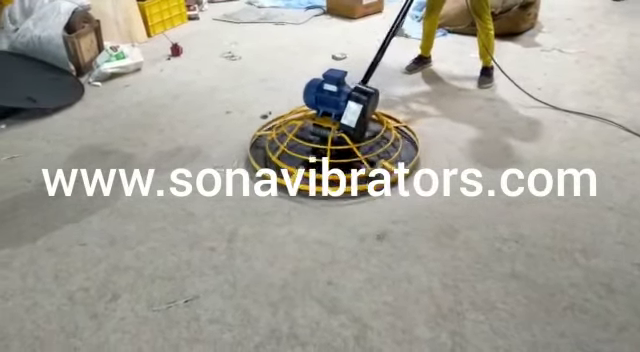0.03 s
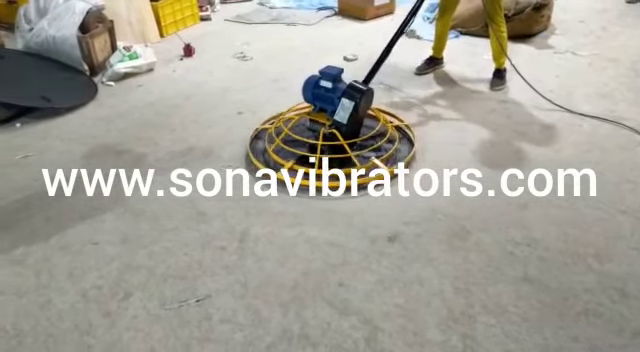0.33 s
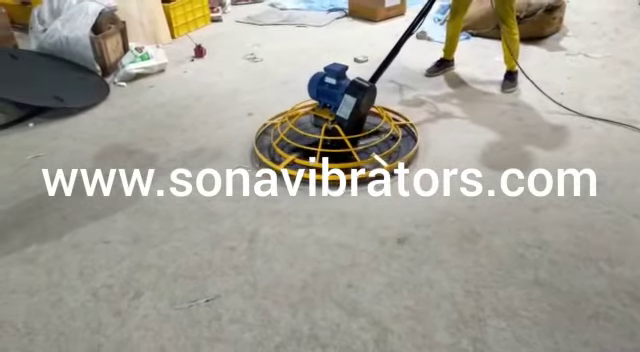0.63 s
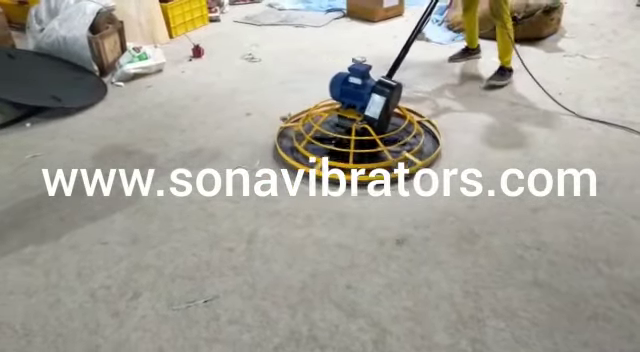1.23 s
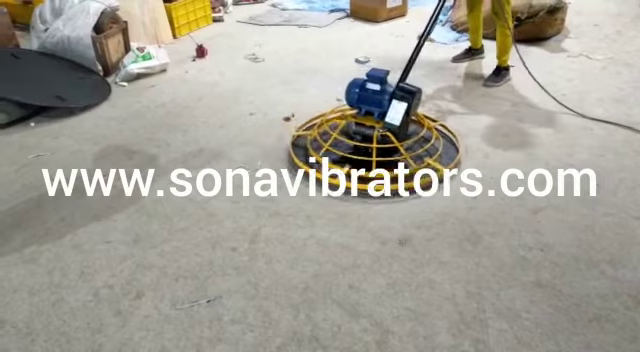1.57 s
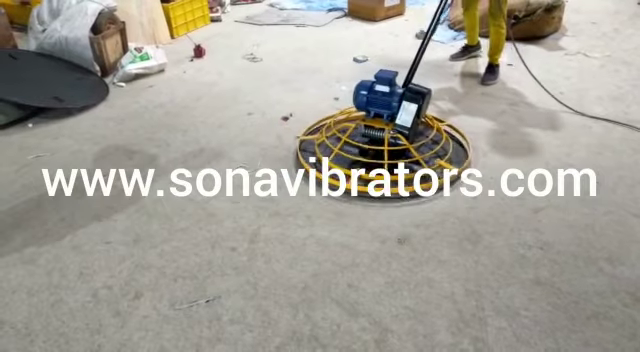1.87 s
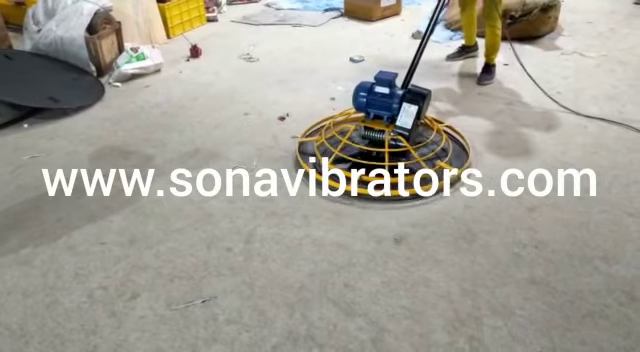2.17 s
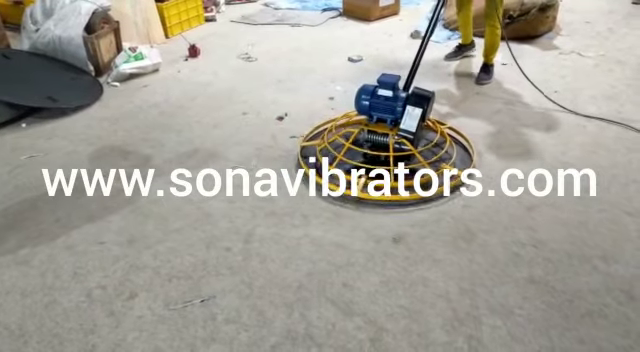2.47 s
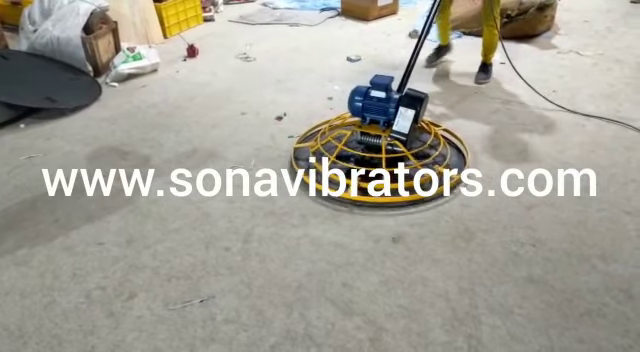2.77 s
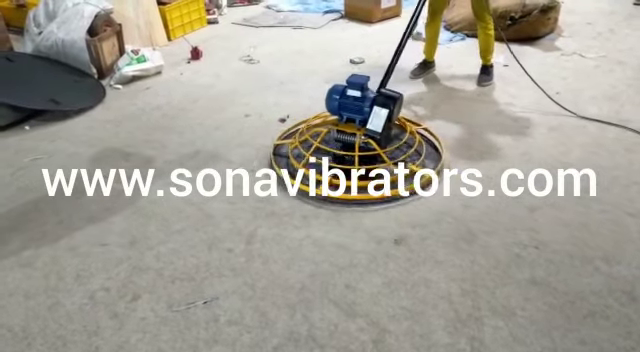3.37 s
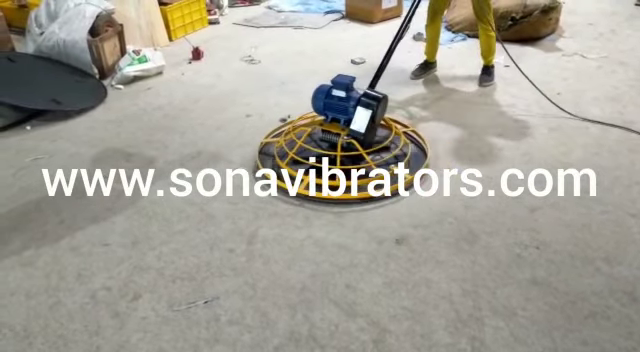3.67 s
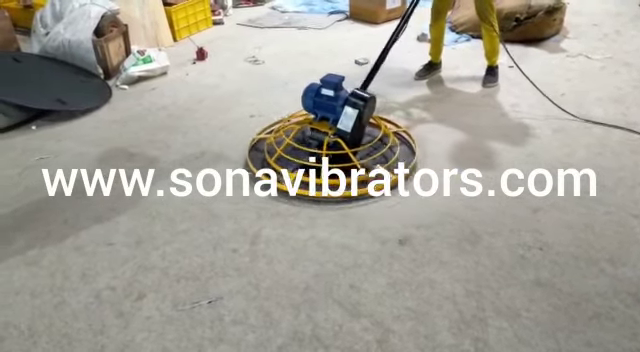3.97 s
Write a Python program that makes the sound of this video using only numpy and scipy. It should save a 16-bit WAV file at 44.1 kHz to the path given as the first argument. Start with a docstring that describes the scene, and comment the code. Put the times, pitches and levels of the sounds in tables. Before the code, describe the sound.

A power trowel scrapes a concrete floor with a continuous gritty roar over a faint low hum. Hollow metal knocks, rattles and bright rasps break through, heard from a few metres away in an echoing workshop.

```python
"""An electric power trowel polishes concrete in a hard-walled workshop, a few metres from a mono microphone.
From the start, grit crushed under the spinning steel roars over a low drive hum. At 0.3 s one stone snaps,
and high spots in the floor begin to knock and rattle the pan. The roar eases around 1.3 s, rasps on rough
patches and builds again, with more knocks and rattles, while the hum sinks slowly to the end."""
import sys
import numpy as np
from scipy import signal
from scipy.fft import rfft, irfft
from scipy.io import wavfile
from scipy.ndimage import map_coordinates

SR = 44100
rng = np.random.default_rng(int(sys.argv[2]) if len(sys.argv) > 2 else 0)


def dump(signal):
    """Clip the signal to [-1, 1] and save it as 16-bit WAV at the path in sys.argv[1]."""
    limited = np.clip(np.atleast_2d(signal).T, -1, 1)
    pcm = np.round(limited * 32767).astype(np.int16)
    wavfile.write(sys.argv[1], SR, pcm)


N = 176400
TIME = np.arange(N) / SR
GRIT_PER_S, SAND_PER_S, RATTLES_PER_S = 12000, 14000, 1200


def undb(db):
    """Decibels to gain."""
    return 10 ** (np.asarray(db) / 20)


def unit(x):
    """Scale to rms 1."""
    return x / np.sqrt(np.mean(x ** 2))


def curve(table, column):
    """One column of a table, joined by straight lines in time."""
    rows = np.array(table)
    return np.interp(TIME, rows[:, 0], rows[:, column])


def colour(x, outline):
    """Filter by a (frequency [Hz], level [dB]) outline; rms 1."""
    hz, db = np.array(outline).T
    f = np.fft.rfftfreq(N, 1 / SR) + 1
    gain = undb(np.interp(np.log(f), np.log(hz), db))
    return unit(irfft(rfft(x) * gain, N))


def wander(per_s):
    """Smooth random drift; rms 1."""
    return unit(map_coordinates(rng.standard_normal(2048), [TIME * per_s], order=3, mode="mirror"))


def grains(per_s, spread_db):
    """Random tiny impacts, mostly weak with a few strong ones."""
    hit = rng.random(N) < per_s / SR
    size = undb(spread_db * np.minimum(rng.exponential(size=N), 6))
    return unit(hit * size * np.sign(rng.standard_normal(N)))


def burst(start, length, attack_s, release_s):
    """An envelope that rises, holds and dies away."""
    age = TIME - start
    return np.clip(age / attack_s, 0, 1) * np.exp(-np.maximum(age - length, 0) / release_s)


def ring(x, modes):
    """A bank of resonances with unit power gain."""
    f = np.fft.rfftfreq(2 * N, 1 / SR) + 1
    response = sum(undb(db) / (1 + 1j * (f / hz - hz / f) * hz / width) for hz, width, db in modes)
    response /= np.sqrt(np.mean(abs(response) ** 2))
    return irfft(rfft(x, 2 * N) * response)[:N]


def workshop(x, wet_db=-5, t60_s=.85, gap_s=.006, change_hz=.2966):
    """The microphone hears direct sound and the walls' echo, whose pattern shifts as the machine moves."""
    t = TIME[:SR]
    tails = rng.standard_normal((2, SR)) * np.exp(-np.log(1000) * t / t60_s) * (t > gap_s)
    primed = np.concatenate([x[-SR:], x])  # the room is already sounding at the start
    here, there = (signal.fftconvolve(primed, tail / np.linalg.norm(tail))[SR:SR + N] for tail in tails)
    angle = 2 * np.pi * change_hz * TIME
    echo = here * np.cos(angle) + there * np.sin(angle)
    return (x + undb(wet_db) * echo) / np.hypot(1, undb(wet_db))


# Spectrum of the room tone (frequency [Hz], relative level [dB])
RUMBLE_SPECTRUM = [(10, -1.5), (25, -6.5), (60, 1), (100, -8.5), (170, 1), (280, -3), (500, -2),
                   (2000, -38)]

def room_tone():
    """The workshop's steady low rumble, all around the microphone."""
    return undb(-51) * colour(rng.standard_normal(N), RUMBLE_SPECTRUM)


# Course of the drive's hum (time [s], pitch [Hz], level [dB])
DRIVE_HUM = [(0, 40, -61), (.3, 42.1, -51), (.45, 41.4, -52.5), (.58, 44.7, -55), (.73, 42.76, -48),
             (1.02, 42.8, -58), (1.33, 41.4, -53), (1.55, 40.3, -57), (1.78, 40.8, -56.5),
             (2.1, 40.3, -53.5), (2.45, 37.4, -59), (3.0, 35.9, -56), (4, 33.1, -56)]

def drive(waver_db=2.2, octave_fade_db_per_s=4.5):
    """The electric drive hums low and wavers; its octave fades away."""
    phase = 2 * np.pi * np.cumsum(curve(DRIVE_HUM, 1)) / SR
    tone_db = curve(DRIVE_HUM, 2) + waver_db * wander(per_s=13)
    octave_db = -57.5 - octave_fade_db_per_s * TIME + waver_db * wander(per_s=6)
    return np.sqrt(2) * (np.sin(phase) * undb(tone_db) + np.sin(2 * phase) * undb(octave_db))


# Spectrum of the snapping stone (frequency [Hz], relative level [dB])
SNAP_SPECTRUM = [(1000, -25), (3000, -14), (4100, -7), (4560, 1), (5100, -6), (6200, -5), (7400, -5),
                 (8200, -14)]

def stone(start_s=.2848, decay_s=.0088):
    """A stone snaps against the steel: a bright crack of a few milliseconds."""
    envelope = np.exp(-np.maximum(TIME - start_s, 0) / decay_s) * (TIME > start_s)
    crack = undb(-13.5) * envelope * colour(rng.standard_normal(N), SNAP_SPECTRUM)
    return workshop(crack, wet_db=-6.5)


# Modes of the steel pan (frequency [Hz], width [Hz], relative level [dB])
PAN_MODES = [(335, 14, -11), (368, 22, -4), (393, 8, 7), (417, 7, 4), (468, 12, -3), (495, 22, -3),
             (582, 8, 2), (607, 11, 0), (640, 25, -4), (755, 30, -2), (924, 30, 0)]

def pan(force):
    """The steel pan rings when it is struck or rubbed."""
    return ring(force, PAN_MODES)


# Hollow knocks of the pan (time [s], peak level before the room [dB])
PAN_KNOCKS = [(.335, -19), (.505, -24), (.745, -17), (1.63, -18), (2.36, -25), (2.72, -19), (2.875, -25)]

def knocks(contact_s=.0026):
    """The pan drops back on the floor: a soft blow that rings mostly its lowest modes."""
    force = np.sin(np.pi * TIME / contact_s) ** 2 * (TIME < contact_s)
    knock = pan(force)
    knock /= np.max(abs(knock))
    return workshop(sum(undb(db) * np.interp(TIME - at, TIME, knock, left=0) for at, db in PAN_KNOCKS))


# Spectrum of the pan's boom (frequency [Hz], relative level [dB])
BOOM_SPECTRUM = [(60, -30), (180, -10), (260, -7), (305, -14), (380, 5.5), (437, -8), (490, 12),
                 (600, -9.5), (900, 2), (2000, -25.5)]
# Spectrum of its clatter (frequency [multiple of the centre], relative level [dB])
CLATTER_SPECTRUM = [(.1, -26), (.25, -28), (.5, -11), (.75, -3), (1, 0), (1.25, -3), (1.7, -11), (2.6, -19),
                    (5, -60)]
# High spots (time [s], length [s], relative boom level [dB], clatter level [dB], clatter centre [Hz])
HIGH_SPOTS = [(0.281, 0.04, -28, -22.5, 850), (0.338, 0.06, -28.5, -26.5, 1200),
              (0.475, 0.06, -36, -33.5, 1100), (0.696, 0.035, -33, -28, 1250), (0.77, 0.056, -39, -32, 950),
              (1.565, 0.094, -35, -30.5, 950), (1.714, 0.018, -34, -30, 950),
              (1.835, 0.035, -42, -23, 1350), (1.9, 0.08, -48, -27, 1600), (2.066, 0.1, -39, -37, 1100),
              (2.334, 0.11, -37, -37, 1100), (2.542, .04, -40, -26, 1000), (2.68, 0.075, -32, -28, 950),
              (2.876, .04, -42, -32, 950), (3.405, 0.025, -40, -28, 900), (3.496, 0.027, -37, -29.5, 950),
              (3.59, 0.02, -35, -28, 950), (3.702, 0.022, -35.5, -29, 1100), (3.919, .04, -39, -26, 1150)]

def bumps(spread_db=2):
    """Each high spot in the floor sets off a short burst of rattling: the pan booms and clatters."""
    boom_gain, clatter = 0, 0
    for start, length, boom_db, clatter_db, centre_hz in HIGH_SPOTS:
        push = burst(start, length, attack_s=.006, release_s=.03)
        boom_gain = np.hypot(boom_gain, push * undb(boom_db))  # overlapping booms add in power
        spectrum = [(ratio * centre_hz, db) for ratio, db in CLATTER_SPECTRUM]
        rattle = colour(grains(RATTLES_PER_S, spread_db), spectrum)
        clatter += push * undb(clatter_db) * rattle
    taps = grains(RATTLES_PER_S, spread_db)
    thuds = colour(grains(RATTLES_PER_S, spread_db), BOOM_SPECTRUM)
    boom = undb(-3) * pan(taps * boom_gain) + undb(-8.5) * boom_gain * thuds
    return workshop(boom + clatter)


# Spectrum of a rasp (frequency [Hz], relative level [dB])
RASP_SPECTRUM = [(1200, -29.5), (2400, -8), (3600, 1), (4600, -0.5), (5700, -1), (7000, -1), (8100, -22)]
# Rough patches in the concrete (time [s], length [s], level [dB])
ROUGH_PATCHES = [(.37, .03, -31), (1.285, .06, -34), (1.485, .13, -29), (1.805, .17, -29.5),
                 (2.385, .04, -33), (2.58, .05, -31.5), (2.69, .13, -32), (3.54, .03, -32),
                 (3.675, .03, -32)]

def rasps():
    """The steel bites into a rough patch: a sudden bright rasp."""
    pressure = sum(undb(db) * burst(start, length, attack_s=.015, release_s=.018)
                   for start, length, db in ROUGH_PATCHES)
    return workshop(pressure * colour(grains(SAND_PER_S, spread_db=2.4), RASP_SPECTRUM))


# Broad modes of the steel edges (frequency [Hz], width [Hz], relative level [dB])
EDGE_MODES = [(1450, 130, -9), (1985, 105, 3.5), (2230, 130, -7), (2400, 110, -8), (3634, 40, -14),
              (3980, 150, -8)]

def steel_edges(rub, wander_db=1.6):
    """The scraping edges ring, each mode drifting in level on its own."""
    return unit(sum(undb(db + wander_db * wander(per_s=12)) * ring(rub, [(hz, width, 0)])
                    for hz, width, db in EDGE_MODES))


# Spectrum of the crushed grit (frequency [Hz], relative level [dB])
ROAR_SPECTRUM = [(100, -32.5), (290, -29.5), (375, -13), (437, -16.5), (500, -11.5), (690, -10.5),
                 (900, -8), (1200, -6), (1450, -3), (1800, -2.5), (2400, -1.5), (2750, -4.5), (3250, -12),
                 (4000, -10), (4500, -10.5), (5200, -20.5), (8000, -51.5)]
# Spectrum of the fine sand (frequency [Hz], relative level [dB])
HISS_SPECTRUM = [(1500, -19.5), (2800, 5), (3500, 6.5), (3750, 3), (4000, 6.5), (4450, 3.5), (4900, 0),
                 (5500, 1), (6000, 0.5), (6370, 4.5), (6600, 0), (6900, 4), (7300, -5), (7650, -6),
                 (8100, -42)]
# The scrape from a few metres (time [s], roar level [dB], relative hiss level [dB], edge level [dB])
SCRAPE_LEVELS = [(0, -23.3, -32, -30), (.1, -23.9, -34, -30), (.2, -25, -38, -30.5), (.27, -25, -37.5, -30),
                 (.44, -23.3, -35.5, -28), (.57, -23.8, -33.7, -29.5), (.69, -24.8, -35.3, -29.5),
                 (.82, -24.5, -35.7, -29.5), (.96, -26.3, -36.5, -33), (1.08, -26.3, -36.7, -31.5),
                 (1.24, -27.8, -38.5, -35), (1.34, -28, -37, -35), (1.45, -27.2, -37, -32),
                 (1.56, -26.8, -36, -33), (1.65, -25.5, -35, -31.5), (1.78, -26.7, -36, -32),
                 (1.94, -23.7, -34.5, -28.5), (2.12, -25, -35, -31.5), (2.31, -25, -34.3, -29.5),
                 (2.4, -25.6, -35.3, -32), (2.53, -25.7, -35.3, -30.5), (2.7, -23.6, -33, -29.5),
                 (2.95, -23.6, -32.8, -28.5), (3.2, -23.8, -33.3, -27.5), (3.45, -23.3, -33.8, -26.7),
                 (3.66, -23.6, -34.8, -27.5), (3.82, -24.1, -36.3, -28), (4, -24, -37.3, -28)]

def scrape(flutter_db=.4, surge_db=.6):
    """Grit roars and rings the steel, fine sand hisses; uneven contact makes them flutter and surge."""
    flutter = undb(flutter_db * wander(per_s=28))
    surge = undb(surge_db * wander(per_s=22))
    grit = grains(GRIT_PER_S, spread_db=2.3) * flutter
    rub = grains(GRIT_PER_S, spread_db=2.3)
    edges = steel_edges(rub)
    sand = grains(SAND_PER_S, spread_db=2.4) * flutter
    roar = colour(grit, ROAR_SPECTRUM) + undb(-20) * pan(rub)
    hiss = undb(5) * colour(sand, HISS_SPECTRUM)
    return (workshop(roar) * undb(curve(SCRAPE_LEVELS, 1))
            + workshop(hiss) * undb(curve(SCRAPE_LEVELS, 2)) * surge
            + workshop(edges) * undb(curve(SCRAPE_LEVELS, 3)))


def scene():
    """The trowel over the room tone at one microphone, the same in both channels."""
    mono = scrape() + rasps() + bumps() + knocks() + stone() + drive() + room_tone()
    return np.array([mono, mono])


def record(dry):
    """The recorder rolls the treble off at 7750 Hz, then cuts it steeply at 8100 Hz."""
    roll_off = signal.butter(24, 7750, fs=SR, output="sos")
    steep_cut = signal.ellip(10, .2, 80, 8100, fs=SR, output="sos")
    return signal.sosfilt(steep_cut, signal.sosfilt(roll_off, dry))


dry = scene()
out = record(dry)
dump(out)
```